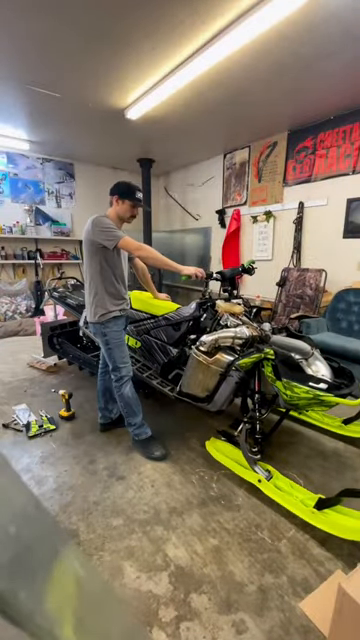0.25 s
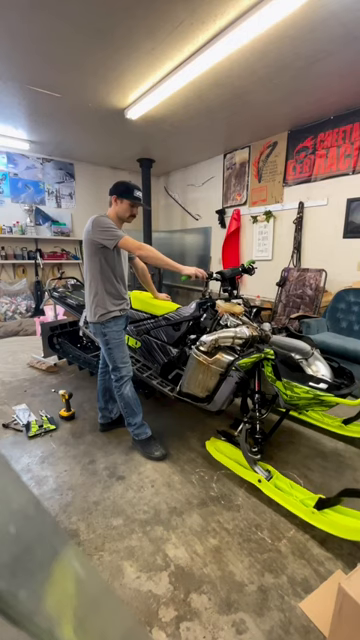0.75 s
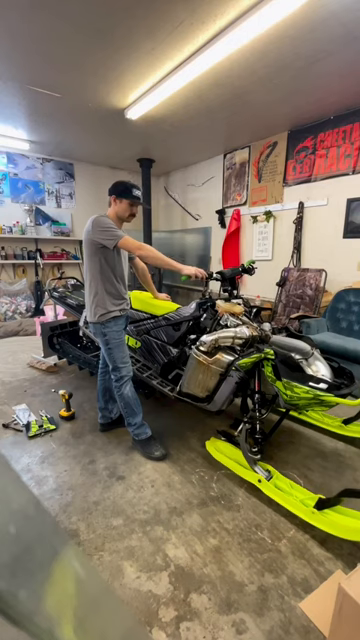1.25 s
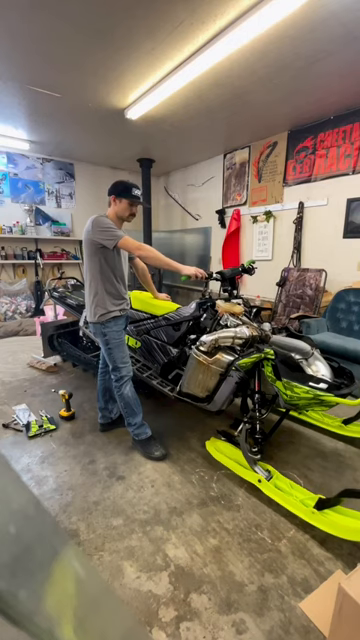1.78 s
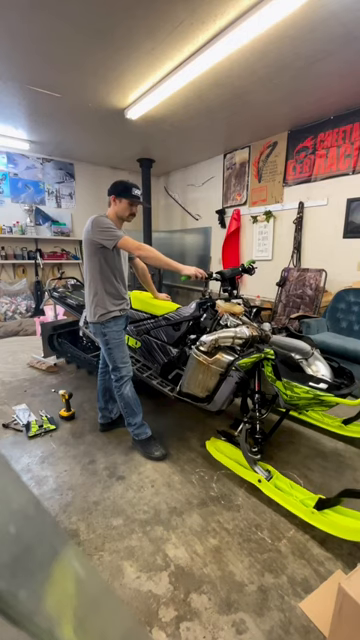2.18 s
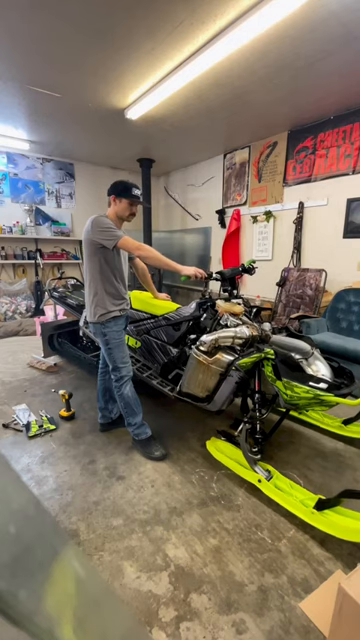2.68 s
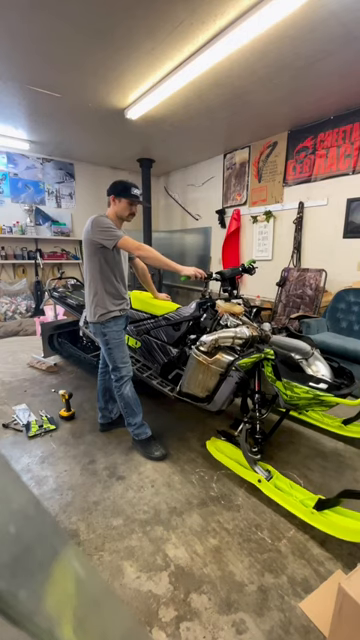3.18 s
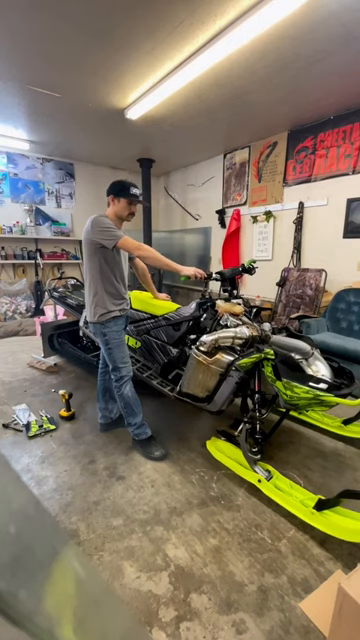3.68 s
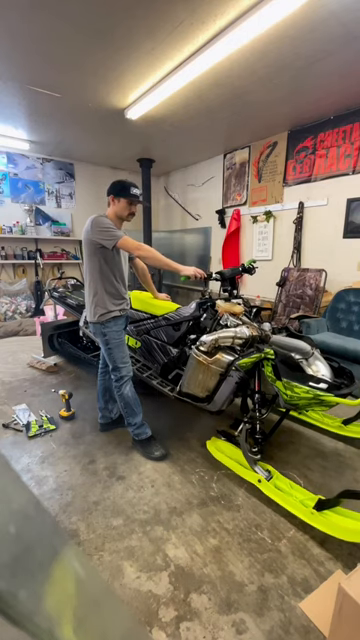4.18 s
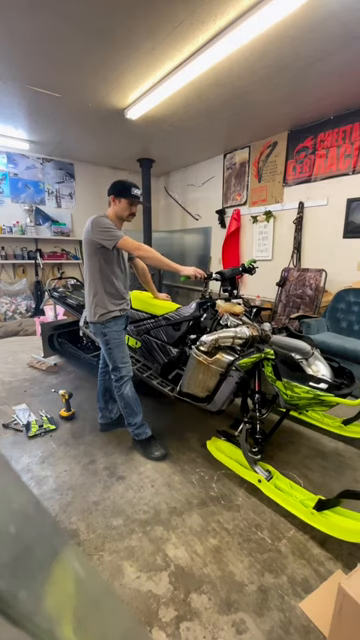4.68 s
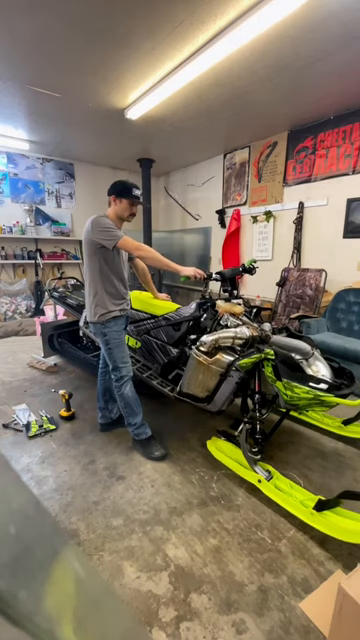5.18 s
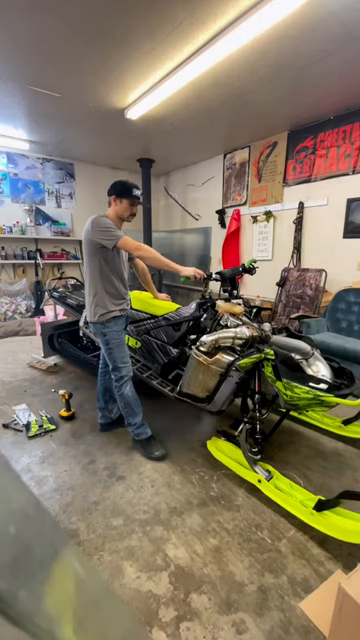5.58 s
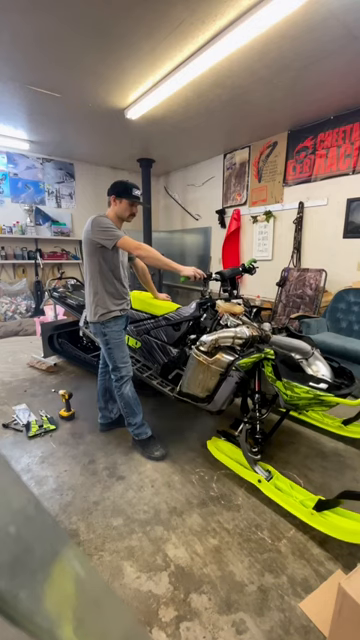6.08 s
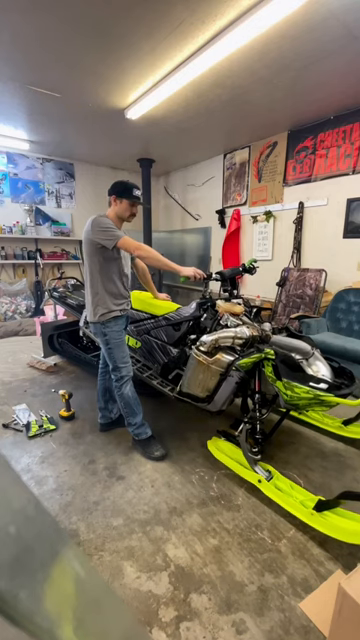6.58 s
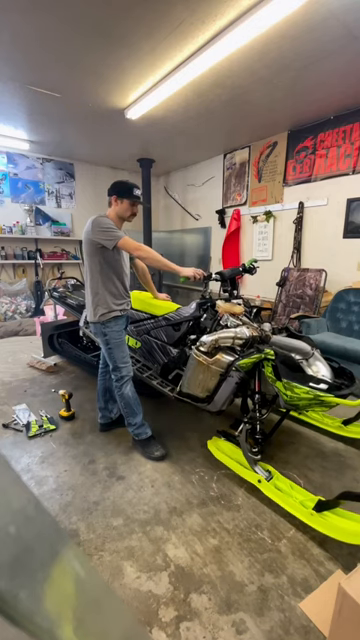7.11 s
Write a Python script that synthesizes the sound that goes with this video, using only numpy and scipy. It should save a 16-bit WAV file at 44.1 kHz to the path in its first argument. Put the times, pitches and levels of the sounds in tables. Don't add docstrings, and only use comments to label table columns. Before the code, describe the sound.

A twin-cylinder two-stroke snowmobile putters unevenly at idle for about a second, then the throttle is blipped five times. Each blip swells into a smooth buzzing growl and falls back. From the third on, the spinning track adds hum and rubbery rush. Small boomy garage, phone a few metres away, fairly muted.

```python
import sys
import numpy as np
from scipy import signal
from scipy.fft import rfft, irfft, next_fast_len
from scipy.io import wavfile
from scipy.ndimage import uniform_filter1d

SR = 44100
rng = np.random.default_rng(int(sys.argv[2]) if len(sys.argv) > 2 else 0)


def ratio_of_db(decibels):
    return 10 ** (np.asarray(decibels, float) / 20)


def wrap_up_sound(samples):
    columns = np.atleast_2d(samples).T
    tamed = np.clip(columns, -1, 1)
    steps = np.round(tamed * 32767).astype(np.int16)
    wavfile.write(sys.argv[1], SR, steps)


N = 324046


def level(x, db):
    return x * ratio_of_db(db) / np.sqrt(np.mean(x ** 2))


def to_db(gain):
    return 20 * np.log10(gain)


def columns(table):
    s, *rest = np.transpose(table)
    return [np.interp(np.arange(N) / SR, s, c) for c in rest]


def law(table, hz):
    rate, *rest = np.transpose(table)
    return [np.interp(hz, rate, c) for c in rest]


def along(table, k):
    hz = np.maximum(np.fft.rfftfreq(N, 1 / SR), 1)
    rows = np.array(table)
    return np.interp(np.log(hz), np.log(rows[:, 0]), rows[:, k])


def walk(rate):
    k = int(SR / rate)
    steps = np.repeat(rng.standard_normal(N // k + 1), k)
    return 1.74 * uniform_filter1d(uniform_filter1d(steps, k), k)[:N]


def ring(x, modes, wander_db):
    total = 0
    for k, (hz, width, db) in enumerate(modes):
        band = signal.lfilter(*signal.iirpeak(hz, hz / width, SR), x)
        total = total + (-1) ** k * ratio_of_db(db + wander_db * walk(6)) * band
    return total


def even(x):
    return x / np.sqrt(uniform_filter1d(x ** 2, size=SR // 5) + 1e-12)


def tone(turns, db, flutter_db):
    gain = np.sqrt(2) * ratio_of_db(db + flutter_db * walk(22))
    return gain * np.sin(2 * np.pi * turns + 0.22 * walk(30))


def garage(x):
    t60_s, wet_db, colour = .4, 0, .25
    t = np.arange(SR // 2) / SR
    tails = rng.standard_normal((2, len(t))) * ratio_of_db(-60 * t / t60_s) * (t > .004)
    tails *= ratio_of_db(wet_db) / np.sqrt(np.sum(tails ** 2, axis=1, keepdims=True))
    tails[0, 0] = 1
    size = next_fast_len(N + SR)
    answer = rfft(tails, size)
    answer /= np.abs(answer) ** (1 - colour)
    return irfft(answer * rfft(x, size), size)[:, :N]


# (frequency [Hz], likeness [0-1], left minus right [dB], left lead [rad])
PORTS = [(40, .975, 2.3, 0), (170, .975, 1.9, -.1), (280, .87, .3, -.3), (500, .3, -1.3, -.6),
         (900, .3, -.6, 3), (1900, .3, -.6, 6.3), (2800, .33, -1.9, 8.9), (5500, .62, -.7, 12.5),
         (7400, .25, -1.1, 14.1), (8450, .75, -1, 15.4), (9150, .95, -.2, 15.71), (9600, .995, 0, 15.71),
         (9680, .2, -.2, 14.6), (11600, .25, 0, 12.6)]


def ports(a, b):
    like = np.clip(along(PORTS, 1), 0, 1)
    half_tilt_db = along(PORTS, 2) / 2
    a, b = rfft(a), rfft(b) * np.std(a) / np.std(b)
    right = like * a * np.exp(-1j * along(PORTS, 3)) + np.sqrt(1 - like ** 2) * b
    return irfft(np.array([a * ratio_of_db(half_tilt_db), right * ratio_of_db(-half_tilt_db)]), N)


def clutch_grip():
    bites_s, holds_s = 1.67, 3.23
    return np.interp(np.arange(N) / SR, (bites_s, holds_s), (0, 1))


# (frequency [Hz], width [Hz], level [dB])
RUSH = [(284.8, 9.2, 13), (611.3, 108, 6), (3860, 470, -13.5), (5638, 1100, -20), (2560.7, 619, -16.5)]


def rush(hiss_db):
    noise = level(ring(rng.standard_normal((2, N)), RUSH, 0.2), 0)
    return clutch_grip() * ratio_of_db(hiss_db + 4.0) * noise


# (time [s], lug rate [Hz])
SPIN_1 = [
    (2.55, 122.1),
    (2.85, 119.1),
    (3.0, 100),
]
SPIN_2 = [(3.7, 103.6), (3.85, 112.8), (4.1, 140.5), (4.4, 198), (4.5, 211.9), (4.6, 219), (4.75, 214),
          (5.0, 185.1), (5.2, 147.4)]
SPIN_3 = [(5.45, 116), (5.62, 112), (5.8, 138), (6.3, 231), (6.5, 243.5), (6.7, 228.3), (7.0, 178.5),
          (7.2, 140), (7.35, 132)]


def track_speed():
    hz, = columns(SPIN_1 + SPIN_2 + SPIN_3)
    return hz


# (lug rate [Hz], lug tone [dB], half tone [dB])
TUNNEL = [(103, -49, -63), (120, -38.5, -45), (138, -29, -47), (156.06, -37, -42.5), (193, -31.5, -49.5),
          (219, -20.5, -39.5), (235, -22, -34.5), (244, -27, -30.5)]


def track():
    hz = track_speed()
    lug_db, half_db = law(TUNNEL, hz)
    speeding_up = uniform_filter1d(np.gradient(hz) * SR, size=SR // 10)
    lug_db = lug_db + 2 * np.clip(speeding_up / 150, -.5, 1)
    turns = np.cumsum(hz) / SR
    moving = np.clip((np.arange(N) / SR - SPIN_1[0][0]) / 0.093, 0, 1)
    lugs = tone(turns, lug_db - 1, 1.5) + tone(2 * turns, lug_db - 14, 3)
    halves = tone(turns / 2, half_db - 1, 1.5) + tone(1.5 * turns, half_db - 3, 3)
    return moving * (lugs + halves)


CYLINDERS = [-0.41, -1.93, -0.42, -3.5]


def firings(turns, load):
    burn = np.arange(1, int(turns[-1]))
    timing, strength = rng.standard_normal((N // 100, 2))[:len(burn)].T
    scatter_db = np.interp(np.interp(burn, turns, load), (0, 1), (6.5, 1.6))
    at = np.interp(burn + .008 * scatter_db * timing, turns, np.arange(N)).astype(int)
    unevenness = .6 * np.clip(strength, -3, .9) + np.array(CYLINDERS)[burn % 4]
    pulses = np.zeros(N)
    pulses[at] = ratio_of_db(scatter_db * unevenness - 4 * (burn % 2))
    return pulses


# (frequency [Hz], level [dB per Hz])
HISS = [(300, -15.5), (900, 3.5), (1500, -4.5), (2900, -8.5), (3300, -6.5), (4200, -11), (5500, -7),
        (7000, -10), (9000, -8), (10900, -11), (11200, -22.5), (11700, -18.5), (12000, -54), (13000, -60)]


def gas_hiss(pulses):
    puffs = 0.98 + signal.lfilter([1], [1, -np.exp(-1 / (0.017 * SR))], pulses)
    noise = puffs * rng.standard_normal((2, N))
    return even(irfft(rfft(noise) * ratio_of_db(along(HISS, 1)), N))


# (frequency [Hz], width [Hz], level [dB])
THUMP = [(48, 16, -1.5), (60, 22, 2), (77, 19, 3.5), (120.6, 24.4, 2), (151, 34.5, 2)]


def thump(pulses):
    push = level(pulses, 0) + 2.2 * rng.standard_normal(N)
    return even(garage(ring(ring(push, THUMP, 0), THUMP, 3.0)))


# (frequency [Hz], width [Hz], level [dB])
GROWL = [(135, 40, -8), (180, 30, -4), (212, 25, -3), (245, 30, -2), (288, 26, 0), (355, 40, -1),
         (415, 28, 0), (480, 25, 0)]


def growl(pulses):
    return even(garage(ring(level(pulses, 0) + 1.5 * rng.standard_normal(N), GROWL, 1.5)))


# (frequency [Hz], width [Hz], level [dB])
BARK = [(551, 102, 3.5), (668, 373, -1.5), (778, 480, 4), (1292, 375, 4.5), (1368, 58, 5.5),
        (1773, 395, -9), (1994, 177, 1), (2770, 620, -5)]


def bark(pulses):
    return even(garage(ring(level(pulses, 0) + 1.1 * rng.standard_normal(N), BARK, 1.5)))


def near(hz, centre_hz, width_hz):
    return np.exp(-((hz - centre_hz) / width_hz) ** 2)


def firing_tones(hz, turns, load, first_db, second_db, third_db, thump_db, hiss_db):
    flare_db = 14 * near(3 * hz, 477, 12) + 12.5 * near(3 * hz, 422, 19.95)
    tones = tone(turns, first_db, 2.5)
    tones += tone(2 * turns, second_db + 2, 1)
    tones += tone(3 * turns, third_db - 5 + flare_db, 4)
    tones += near(9 * hz, 1980, 30) * tone(9 * turns, hiss_db - 15, 5)
    fourth_db = to_db(ratio_of_db(first_db) + ratio_of_db(second_db)) - 22
    tones += tone(4 * turns, fourth_db, 4) * load
    tones += tone(turns / 2, thump_db - 3.5, 1.7) * (1 - load) * (hz > 100)
    return tones


def engine(hz, load, first_db, second_db, third_db, thump_db, growl_db, bark_db, hiss_db):
    turns = np.cumsum(hz) / SR
    tones = firing_tones(hz, turns, load, first_db, second_db, third_db, thump_db, hiss_db)
    pulses = firings(turns, load)
    rough = ratio_of_db(thump_db - 1.0) * thump(pulses)
    rough += ratio_of_db(growl_db + 0.83) * growl(pulses)
    rough += ratio_of_db(bark_db + 1.5) * bark(pulses)
    rough += ratio_of_db(hiss_db + 5 + .5 * walk(9)) * gas_hiss(pulses)
    return tones, rough


# (start [s], end [s], tone level [dB], thump level [dB])
BURNS = [(-.1, .98, -37, -31), (0.981, 1.293, -17, -24.5), (1.524, 1.764, -14.5, -19.5),
         (2.15, 2.521, -20, -28), (3.169, 3.364, -35, -32), (3.203, 3.57, -26, -33), (3.762, 4.0, -31, -41),
         (4.014, 4.503, -21.5, -36), (5.23, 5.55, -63, -34), (5.56, 6.4, -23, -44), (7.07, 7.399, -43, -33)]


def burning(k, release_s):
    t = np.arange(N) / SR
    gain = np.zeros(N)
    for row in BURNS:
        attack = np.clip((t - row[0]) / 0.035, 0, 1)
        release = np.exp(-np.maximum(t - row[1], 0) / release_s)
        gain += ratio_of_db(row[k]) * attack * release
    return gain


# (time [s], firing rate [Hz], effort [dB])
BLIP_1 = [
    (0, 60, -39),
    (.96, 60.88, -37),
    (1.09, 67.01, -30.5),
    (1.14, 85.95, -27.5),
    (1.2, 112.6, -23),
    (1.3, 118.2, -27),
    (1.4, 105.5, -28.5),
    (1.51, 94.7, -31),
]
BLIP_2 = [(1.56, 97.7, -26.5), (1.62, 108, -24.5), (1.69, 136.7, -20.5), (1.755, 160, -18.5),
          (1.8, 163.6, -22), (1.85, 158.9, -22), (1.93, 144.1, -24), (2.0, 133.5, -25), (2.12, 120.1, -29)]
BLIP_3 = [(2.2, 125.1, -27), (2.4, 194.7, -17.5), (2.5, 219.2, -21.5), (2.6, 211.9, -22.5),
          (3.0, 154.2, -29.5), (3.15, 139.2, -31), (3.3, 133.5, -30.5), (3.4, 137.5, -28),
          (3.5, 157.9, -27.5)]
BLIP_4 = [(3.6, 162, -26.5), (3.9, 179.6, -25.5), (4.1, 205.1, -21.5), (4.2, 215.5, -23), (4.45, 222, -23),
          (4.6, 216, -23), (4.7, 192.4, -27), (5.1, 149.5, -31.5), (5.3, 138.6, -32.5)]
BLIP_5 = [(5.6, 137.6, -34), (5.8, 176.5, -28), (6.0, 211.2, -24.5), (6.2, 220, -25), (6.4, 221.2, -24.5),
          (6.5, 214.7, -26), (6.8, 165.1, -30), (7.0, 146, -31), (7.35, 138.7, -34)]
# (firing rate [Hz], burning 1st partial [dB], 2nd [dB],
# 3rd [dB], thump [dB], coasting 1st partial [dB], 2nd [dB])
EXHAUST = [(60, -7.5, -13, -15.5, -1.5, -40.5, -49), (71.7, 7.5, -24, 1, 1.5, -53, -50),
           (108, -7.5, -14.5, -39, -0.5, -39, -27), (131, -2.5, -12, -13, -1, -34.5, -36),
           (160, -5.5, -38, -8.5, -5.5, -51, -39), (185, 0.5, -20, -18, -10, -36, -54),
           (199.5, 2, 0, -7, -16, -41, -61), (214, 1, 2.5, -6.5, -17, -34, -43),
           (222, -15.5, -2, -15, -12, -45, -54)]


def controls():
    hz, effort_db = columns(BLIP_1 + BLIP_2 + BLIP_3 + BLIP_4 + BLIP_5)
    first, second, third, low, coast_first, coast_second = ratio_of_db(np.array(law(EXHAUST, hz)))
    burn = burning(k=2, release_s=0.025)
    load = np.interp(to_db(burn + 1e-9), (-36, -24), (0, 1))
    burn = burn * ratio_of_db(0.45 * load * (effort_db + 23.5))
    coast = 1 - load
    first_db = to_db(burn * first + coast * coast_first)
    second_db = to_db(burn * second + coast * coast_second)
    third_db = to_db((burn + ratio_of_db(-36)) * third)
    thump_db = to_db(burning(k=3, release_s=0.06) * low + ratio_of_db(-52))
    grip = clutch_grip()
    spin = np.log2(track_speed() / SPIN_1[0][1])
    growl_db = -31.5 + 0.67 * (effort_db + 29.5) + 0.5 * load + 3.5 * grip
    hiss_db = effort_db - 10 - 0.5 * load + 4 * grip + 2.5 * spin
    bark_db = effort_db
    return hz, load, first_db, second_db, third_db, thump_db, growl_db, bark_db, hiss_db


def scene():
    state = controls()
    hiss_db = state[-1]
    tones, rough = engine(*state)
    tones = tones + track()
    quarter_wave_later = signal.hilbert(tones).imag
    return ports(tones, quarter_wave_later) + ports(*(rough + rush(hiss_db)))


def roll_off(x):
    return signal.sosfilt(signal.butter(12, 12360, fs=SR, output="sos"), x)


def record(dry):
    mix = np.tanh(0.84 * dry) / 0.76
    return roll_off(mix)


dry = scene()
out = record(dry)
wrap_up_sound(out)
```